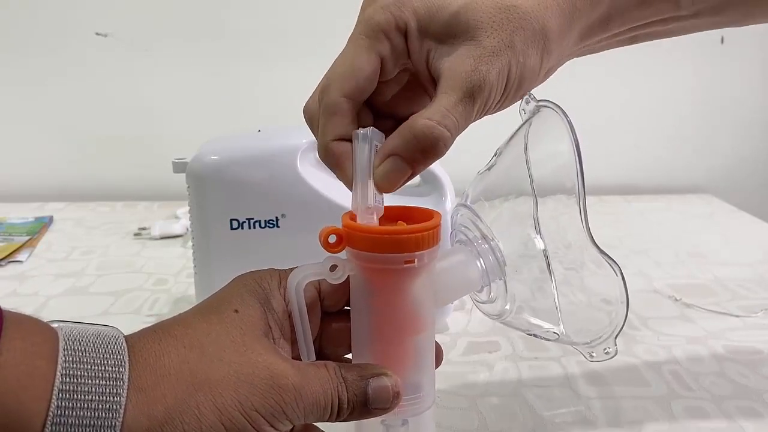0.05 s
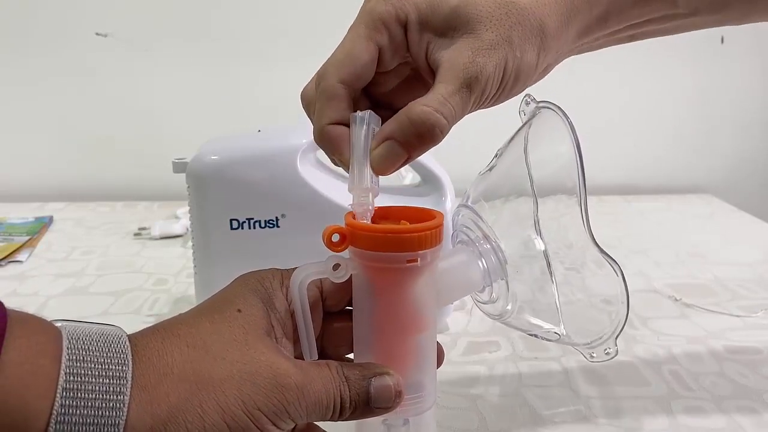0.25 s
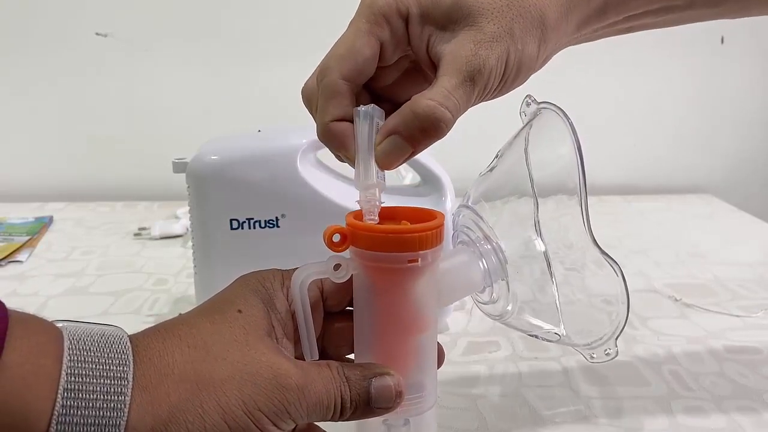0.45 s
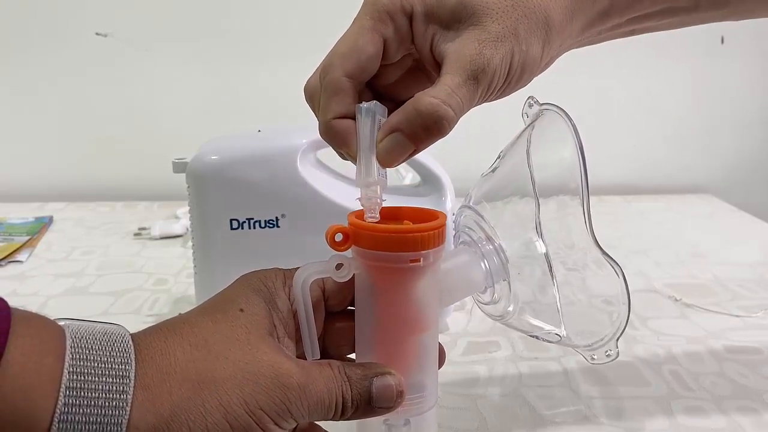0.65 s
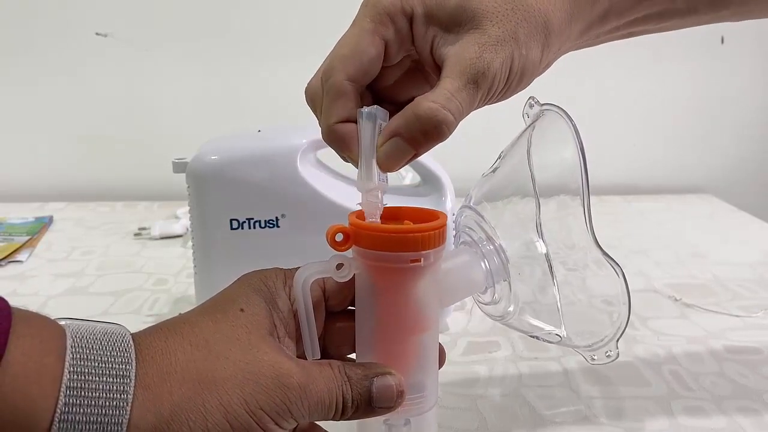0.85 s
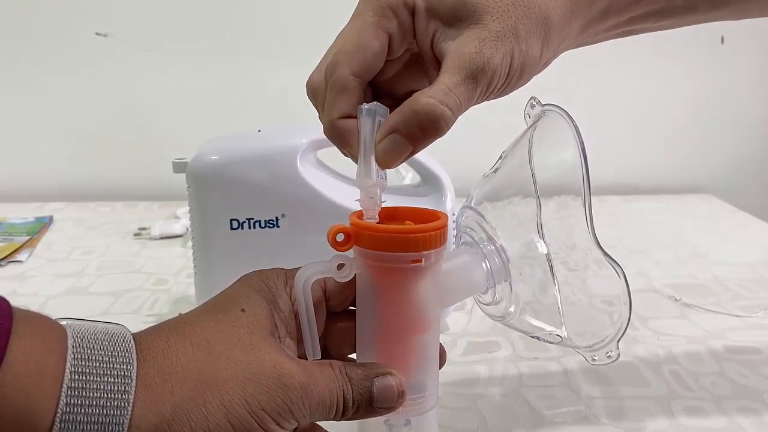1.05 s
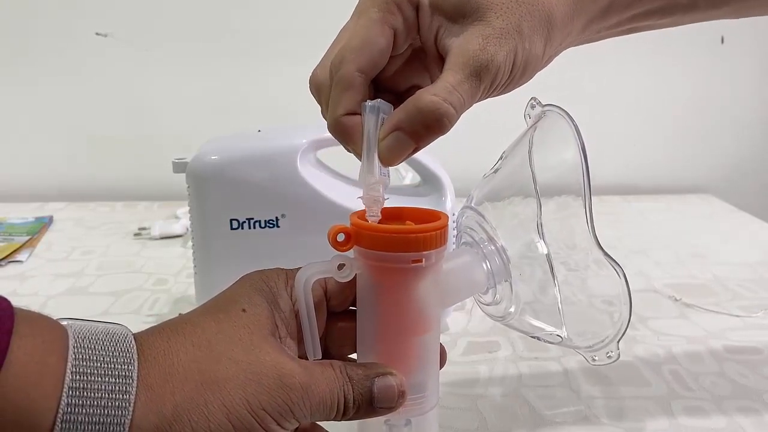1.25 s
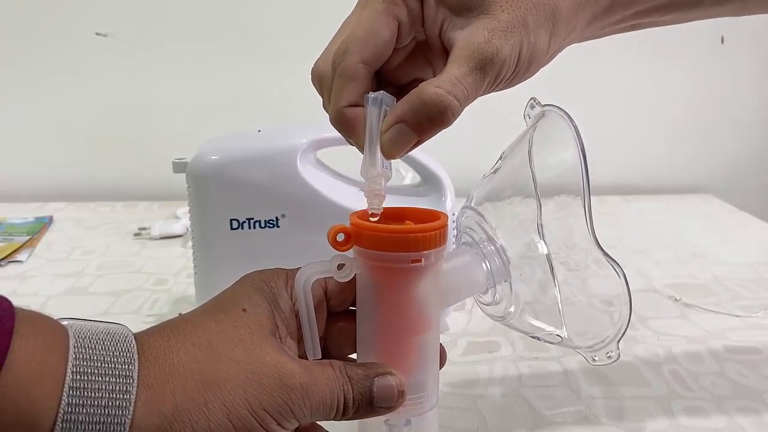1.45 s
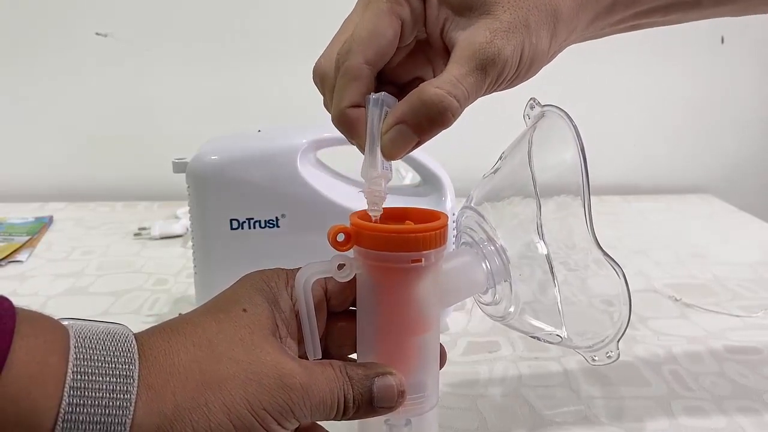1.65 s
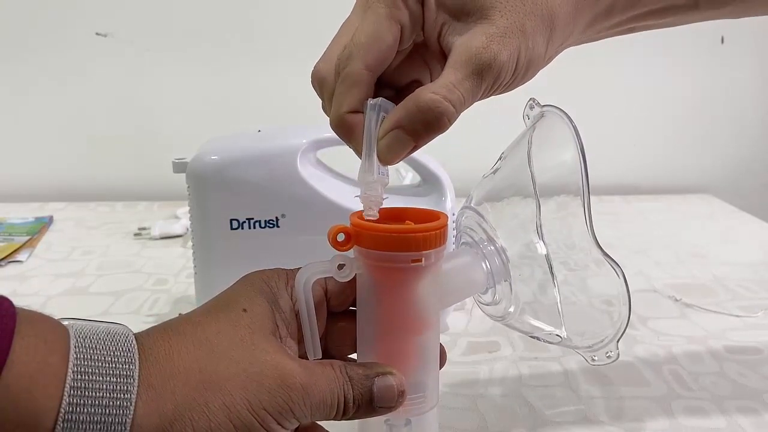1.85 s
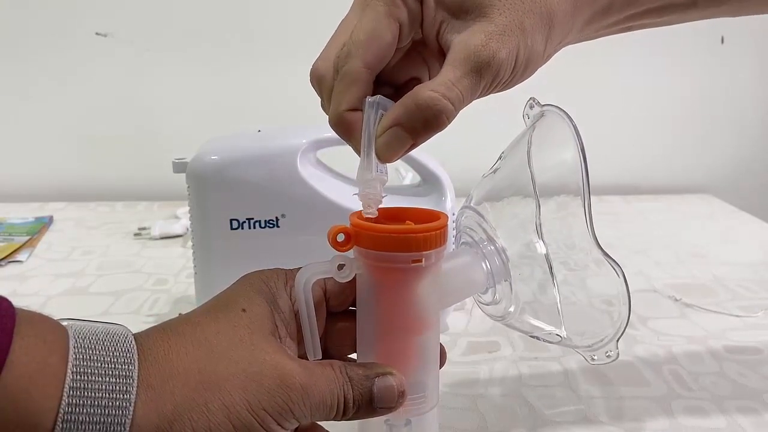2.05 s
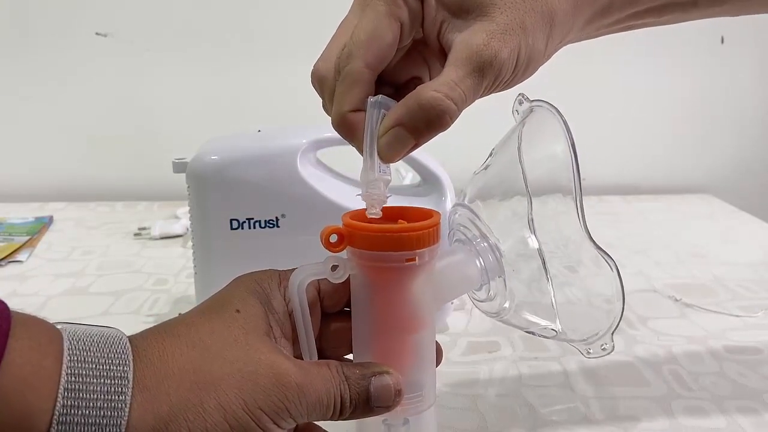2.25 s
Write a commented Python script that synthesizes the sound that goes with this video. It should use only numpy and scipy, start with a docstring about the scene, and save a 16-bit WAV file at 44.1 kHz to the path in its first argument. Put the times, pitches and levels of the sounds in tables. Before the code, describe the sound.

Steady indoor air noise and a faint high whine, with fingers lightly brushing a plastic vial.

```python
"""A quiet room: air rushes softly over low drones, and a thin whine near 6 kHz flutters throughout.
From about 0.5 s, hands brush softly and fingers slip on a small plastic vial with a faint squeak.
A deep rumble, likely from the held microphone, swells towards 1 s, with a few soft bumps.
The whine sags to its lowest pitch near 1.6 s and climbs again; near 1.8 s the fingers rustle once more."""
import sys
import numpy as np
from scipy import signal
from scipy.fft import rfft, irfft
from scipy.io import wavfile
from scipy.ndimage import uniform_filter1d

SR = 44100
rng = np.random.default_rng(int(sys.argv[2]) if len(sys.argv) > 2 else 0)


def master(y):
    """Save y as 16-bit WAV."""
    cut = np.clip(np.atleast_2d(y).T, -1, 1)
    pcm = np.round(cut * 32767)  # scale
    wavfile.write(sys.argv[1], SR, pcm.astype(np.int16))


N = 105840
T = np.arange(N) / SR
HZ = np.maximum(np.arange(N // 2 + 1) * SR / N, 1)  # the frequencies of a spectrum


def whine():
    """A thin tone glides and flutters; at its lowest pitch it steadies and a faint lower tone joins it."""
    # the glide of the whine: time_s, pitch_hz
    glide = [(0, 5945), (.2, 5915), (.45, 5945), (.6, 5960), (.7, 5865), (.8, 5808), (1.05, 5700),
             (1.25, 5600), (1.55, 5512), (1.72, 5512), (1.93, 5625), (2.15, 5775), (2.4, 5855)]
    # how loud the whine is: time_s, level_db
    loudness = [(0, -85), (.06, -76), (.2, -73.5), (.33, -80), (.39, -90), (.43, -77), (.52, -91),
                (.58, -80.5), (.645, -84), (.665, -74), (.7, -73), (.85, -76), (.92, -81), (1.05, -73.5),
                (1.15, -81), (1.2, -77.5), (1.28, -86), (1.5, -88), (1.58, -76), (1.69, -76.5), (1.82, -92),
                (1.94, -78), (2.15, -77), (2.29, -72.5), (2.4, -76)]
    # how loud the lower tone is: time_s, level_db
    lower_loudness = [(1.48, -105), (1.58, -86), (1.7, -87), (1.8, -105)]
    settle_hz, jitter_hz, lower_hz, steadiness = 70, 13, 4823, 1.1
    pitch = curve(glide)
    unrest = np.clip((pitch - pitch.min()) / settle_hz, 0, 1)  # 0 at the lowest pitch
    hz = pitch + unrest * jitter_hz * walk(per_s=90)
    flutter = level(np.tanh(steadiness + walk(per_s=80)), 0)
    tone = (1 - unrest + unrest * flutter) * np.sin(2 * np.pi * np.cumsum(hz) / SR)
    lower_tone = np.sin(2 * np.pi * lower_hz * T)
    return level(tone, curve(loudness)) + level(lower_tone, curve(lower_loudness))


def fingers():
    """Skin slips on the vial, and many tiny clicks make the plastic ring."""
    # finger slips: start_s, fade_s, level_db
    slips = [(.594, .035, -77), (.63, .055, -81.5), (1.815, .03, -82), (1.888, .06, -80)]
    # where the vial rings: pitch_hz, width_hz, relative_db
    vial = [(8350, 750, 0), (13600, 900, -3)]
    clicks_per_s = 8000
    clicks = rng.standard_normal(N) * (rng.random(N) < clicks_per_s / SR)
    plastic = sum(undb(db) * resonate(clicks, hz, width) for hz, width, db in vial)
    return level(plastic, 0) * rubs(slips, rise_s=.012)


def hands():
    """Moving hands brush softly, in short puffs of noise."""
    # brush strokes: start_s, fade_s, level_db
    strokes = [(.46, .05, -64), (.83, .1, -64.5), (1.83, .06, -68), (1.875, .13, -64)]
    # tone colour of a brush: frequency_hz, relative_db
    colour = [(250, -11), (420, -15), (950, 10), (1400, 0), (2000, -16), (4500, -31)]
    return level(noise(colour), 0) * rubs(strokes, rise_s=.011)


def squeak():
    """Skin sticks and slips on the plastic: a rough tone that sags as the finger slows."""
    # the squeak after the first slip: start_s, fade_s, level_db
    squeaks = [(.615, .19, -86.5)]
    start_s = squeaks[0][0]
    start_hz, sag_hz_per_s, jitter_hz = 7920, 1300, 35
    hz = start_hz - sag_hz_per_s * (T - start_s) + jitter_hz * walk(per_s=400)
    tone = np.sin(2 * np.pi * np.cumsum(hz) / SR)
    return level(tone, 0) * rubs(squeaks, rise_s=.012)


def rumble():
    """A deep rumble swells and fades, likely from holding the microphone."""
    # tone colour of the rumble: frequency_hz, relative_db
    colour = [(4, -1.5), (11, 6.5), (17, -2.5), (25, -7), (38, -15), (46, -20), (75, -23.5), (92, -36.5),
              (160, -50)]
    # how loud the rumble is: time_s, level_db
    loudness = [(0, -50.5), (.28, -44), (.5, -40), (.65, -38.5), (.73, -31), (.8, -44), (.87, -34.5),
                (.99, -27), (1.09, -35), (1.13, -45), (1.3, -43), (1.4, -55), (1.53, -40), (1.75, -50),
                (1.92, -36.5), (2.15, -47.5), (2.4, -59)]
    return level(noise(colour), curve(loudness))


def thumps():
    """Each soft bump swings the microphone for about one cycle."""
    # bumps: peak_time_s, pitch_hz, peak_db
    bumps = [(.71, 36, -33), (.76, 50, -36), (.865, 48, -39), (.922, 45, -38), (1.042, 35, -33),
             (1.098, 44, -29)]
    half_width_cycles = .47
    sound = np.zeros(N)
    for peak_s, hz, db in bumps:
        cycles = (T - peak_s) * hz
        swell = np.exp(-(cycles / half_width_cycles) ** 2)
        sound += undb(db) * swell * np.cos(2 * np.pi * cycles)
    return sound


def draught():
    """A light draught blows on the microphone, mostly on the right."""
    # tone colour of the draught: frequency_hz, relative_db
    colour = [(5, -2.5), (15, 9), (30, -1.5), (70, -4.5), (100, -16.5), (150, -21), (250, -43), (500, -73)]
    left_right_gain = undb([[-11.5], [0]])
    return level(noise(colour), db=-47.5) * left_right_gain


def room():
    """Air rushes and the room drones, with a hum that swells and sinks, a fine hiss and a faint tone."""
    # tone colour of the air: frequency_hz, relative_db
    air_colour = [(95, -10.5), (120, -8), (165, -9), (205, -10), (323, -14), (410, -14), (480, -14.5),
                  (640, -10.5), (780, -16), (1200, -16.5), (1850, -26.5), (3400, -29), (5000, -35),
                  (6500, -61.5)]
    # tone colour of the hiss: frequency_hz, relative_db
    hiss_colour = [(4500, -23), (5100, 1), (6300, -1), (8000, -3), (11000, -5.5), (15000, -7.5)]
    # where the room rings: pitch_hz, width_hz, level_db
    rings = [(54.1, 8.1, -55.5), (68.4, 7.1, -57), (136.9, 10, -71), (419, 16, -74), (508.5, 17, -75),
             (634, 87, -77.5), (849, 8.2, -80.5)]
    # how loud the hum is: time_s, level_db
    hum_loudness = [(0, -75), (.12, -65), (.29, -61), (.68, -72), (1.15, -71), (1.4, -64.5), (1.9, -72.5),
                    (2.4, -64.5)]
    wander_db, tone_hz = .04, 7043
    air = level(noise(air_colour), db=-59.5) * undb(wander_db * walk(per_s=6.4))
    drones = sum(level(resonate(rng.standard_normal(N), hz, width), db) for hz, width, db in rings)
    hum = resonate(rng.standard_normal(N), hz=266.8, width_hz=26.2)
    tone = level(np.sin(2 * np.pi * tone_hz * T), db=-97.5)
    hiss = level(noise(hiss_colour), db=-78.5)
    return air + drones + level(hum, curve(hum_loudness)) + tone + hiss


def undb(db):
    """Turn decibels into a gain to multiply by."""
    return 10 ** (np.asarray(db) / 20)


def level(x, db):
    """Bring a sound to an average (rms) size of 1, then apply a level in decibels."""
    return x * undb(db) / np.sqrt(np.mean(x ** 2))


def curve(rows):
    """Join (time_s, value) rows by straight lines."""
    return np.interp(T, *np.array(rows).T)


def walk(per_s):
    """Smooth random motion with a typical size of 1."""
    hold = int(SR / per_s)
    steps = np.repeat(rng.standard_normal(N // hold + 1), hold)
    return level(uniform_filter1d(steps, hold)[:N], 0)


def noise(colour):
    """Noise shaped by (frequency_hz, relative_db) rows, fading steeply beyond both ends."""
    hz, db = np.array(colour).T
    edges = 1 / np.sqrt((1 + (hz.min() / HZ / 2) ** 8) * (1 + (HZ / hz.max() / 2) ** 8))
    shape = undb(np.interp(np.log(HZ), np.log(hz), db))
    return irfft(rfft(rng.standard_normal(N)) * edges * shape, N)


def resonate(x, hz, width_hz):
    """Make a sound ring near one pitch: a band-pass filter applied twice."""
    return irfft(rfft(x) / (1 + 1j * (HZ / hz - hz / HZ) * hz / width_hz / 2) ** 2, N)


def rubs(rows, rise_s):
    """Loudness of short rubs: each rises quickly and fades evenly."""
    return sum(undb(db) * np.interp(T - start_s, [0, rise_s, rise_s + fade_s], [0, 1, 0])
               for start_s, fade_s, db in rows)


def scene():
    """Everything sits in the centre except the draught, which leans right."""
    return room() + whine() + fingers() + hands() + squeak() + rumble() + draught() + thumps()


def record(dry):
    """A steep filter cuts off the highest treble."""
    top_hz = 15150
    return signal.sosfilt(signal.ellip(12, .1, 80, top_hz, fs=SR, output="sos"), dry)


dry = scene()
out = record(dry)
master(out)
```